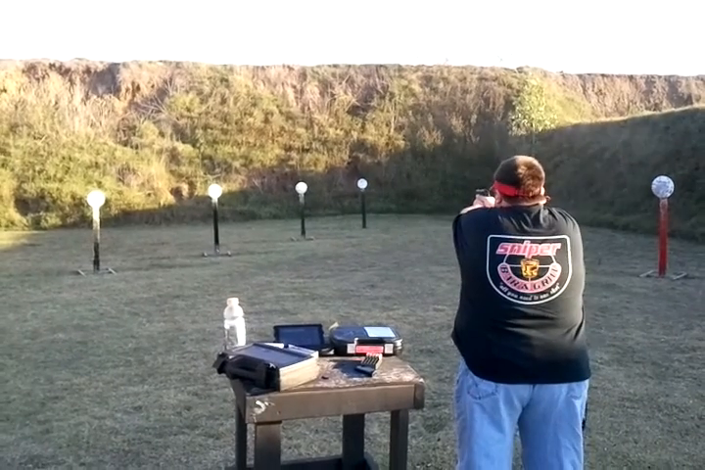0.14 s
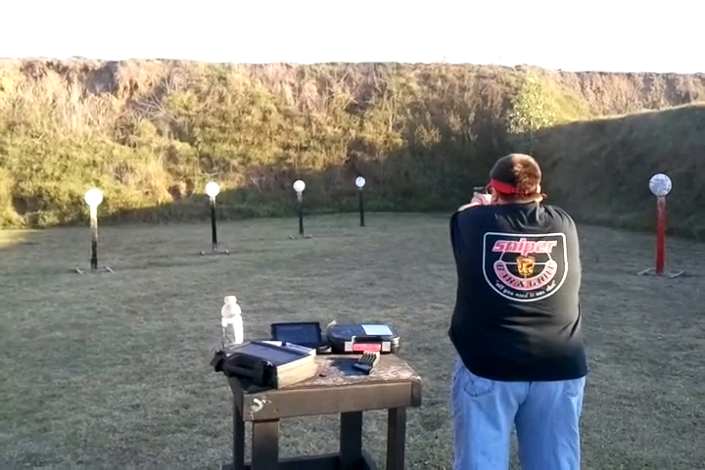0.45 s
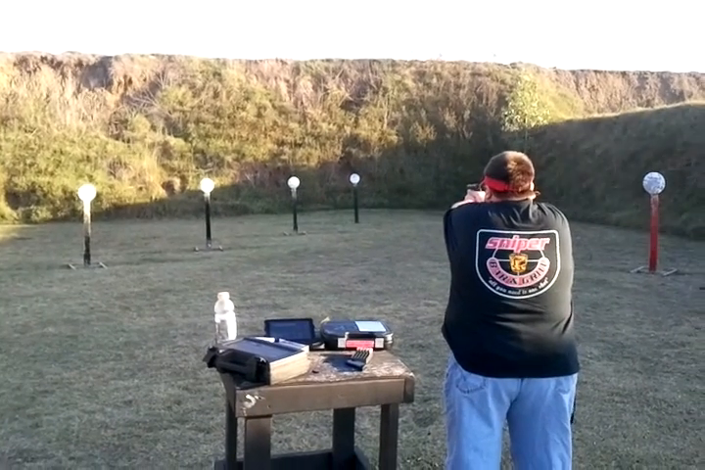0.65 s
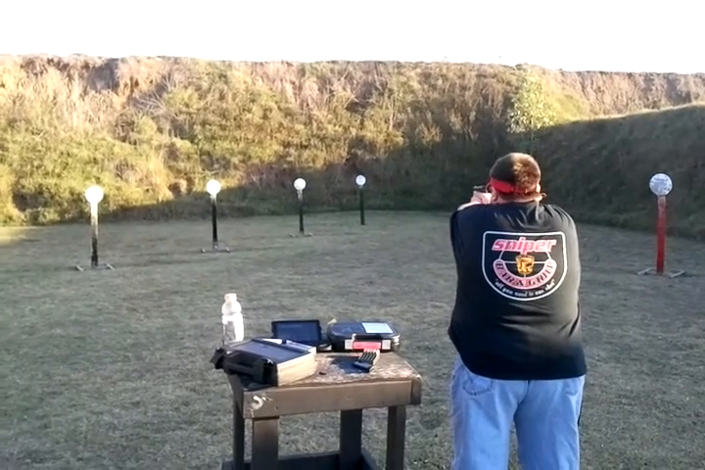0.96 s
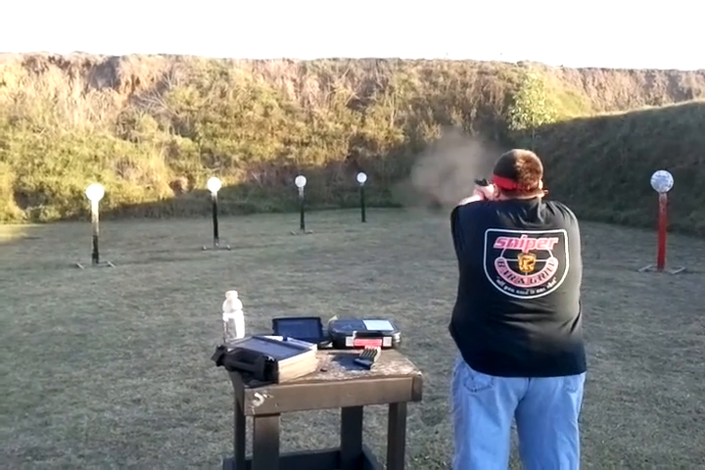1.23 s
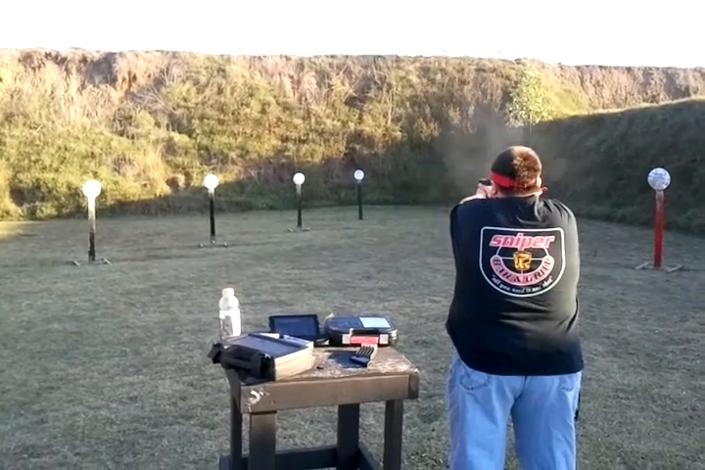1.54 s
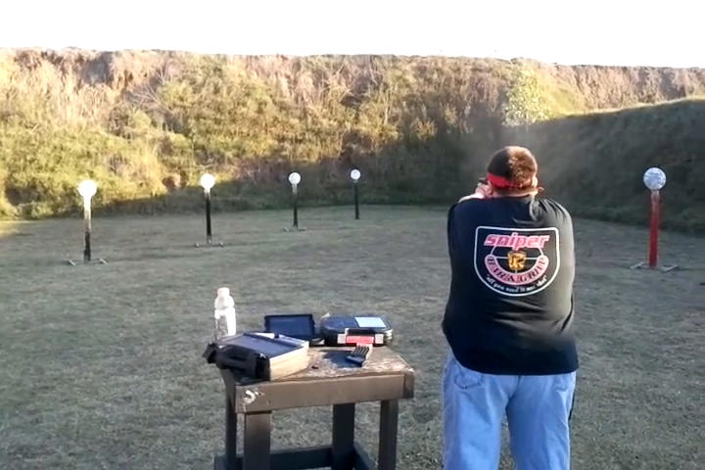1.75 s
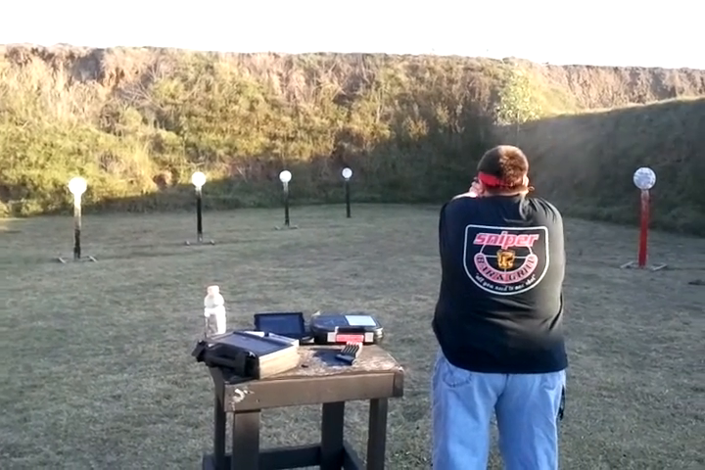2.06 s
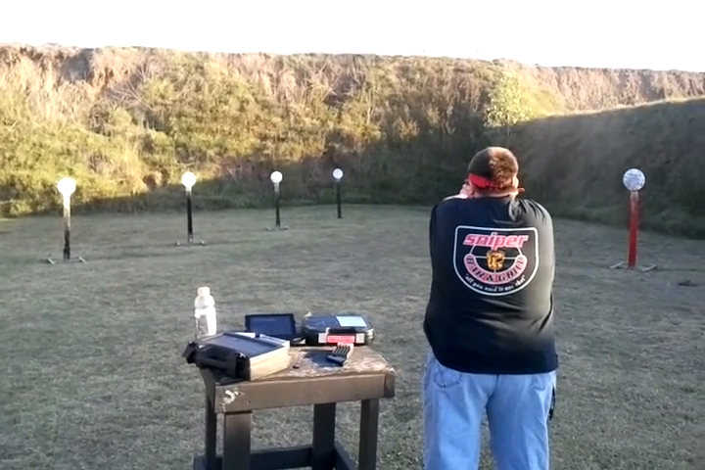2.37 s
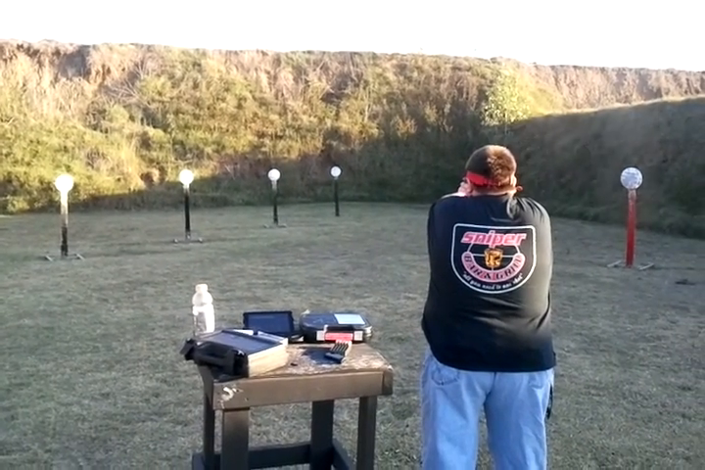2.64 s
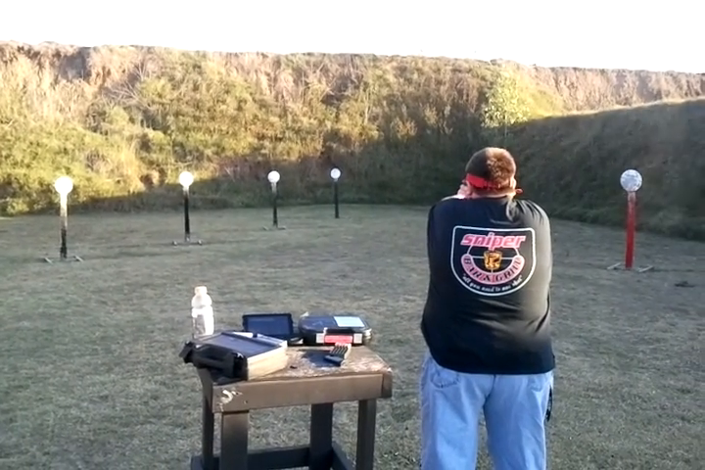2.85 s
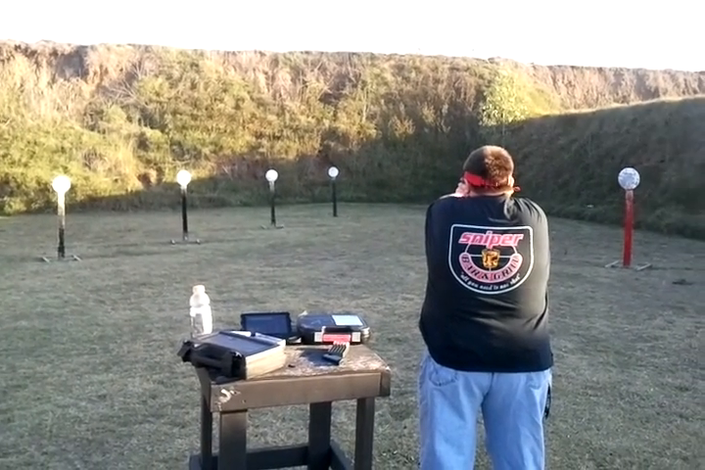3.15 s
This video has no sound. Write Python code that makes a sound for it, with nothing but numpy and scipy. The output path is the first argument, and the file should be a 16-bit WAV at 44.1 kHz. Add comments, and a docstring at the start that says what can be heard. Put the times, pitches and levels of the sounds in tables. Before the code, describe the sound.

A single close revolver shot cracks and echoes as the bullet rings a steel plate.

```python
"""Revolver shot on a steel plate

One shot on an outdoor range, close enough to overload and briefly choke a small microphone.
The bullet rings a steel plate; earth banks and far trees throw the blast back, as they still do
for an earlier shot. The gun's action clicks before and after, over a low rumble of wind."""
import sys
import numpy as np
from scipy import signal
from scipy.fft import rfft, irfft
from scipy.io import wavfile

SR = 44100
rng = np.random.default_rng(int(sys.argv[2]) if len(sys.argv) > 2 else 0)


def dump_mix(stems):
    """Bounce the given channels to the path in sys.argv[1] as a 16-bit WAV at rate SR."""
    frames = np.atleast_2d(stems).T  # one column per channel
    limited = np.clip(frames, -1, 1)  # hard clip at full scale
    pcm = np.round(limited * 32767).astype(np.int16)
    wavfile.write(sys.argv[1], SR, pcm)


N = 145530
T = np.arange(N) / SR
SHOT_S, EARLIER_SHOT_S, HIT_S = 1.260, -.541, 1.339
TRAVEL = .51  # the diaphragm's full swing

# Spectrum of the muzzle blast: f/Hz, relative level/dB
BLAST_SPECTRUM = [(40, 5.5), (300, 6.5), (900, 5), (2000, -2.5), (3300, 1), (4600, 6), (7000, -1.5),
                  (10000, -35)]
# Bright sizzle of the echoes and the bullet's splash: f/Hz, relative level/dB
SIZZLE_SPECTRUM = [(500, -40), (1800, -11), (2600, -3.5), (3300, -8), (4400, -0.5), (5300, -1.5),
                   (6800, -9), (10000, -27.5)]


def amp(db):
    """Decibels to gain."""
    return 10 ** (np.asarray(db) / 20)


def unit(x):
    """Scales to rms 1."""
    return x / np.sqrt(np.mean(x ** 2) + 1e-20)


def eq_gain(spectrum, hz):
    """Gain of a dB curve, read on a log-frequency axis."""
    f, db = np.transpose(spectrum)
    return amp(np.interp(np.log(hz + 1), np.log(f + 1), db))


def noise(spectrum):
    """Noise of a given colour, at rms 1."""
    gain = eq_gain(spectrum, np.fft.rfftfreq(N, 1 / SR))
    return unit(irfft(rfft(rng.standard_normal(N)) * gain, N))


def wander(seconds):
    """Smooth random drift on the given time scale, at rms 1."""
    smoothing = np.exp(-(np.fft.rfftfreq(N, 1 / SR) * 2 * seconds) ** 2)
    return unit(irfft(rfft(rng.standard_normal(N)) * smoothing, N))


def fade(t, t60):
    """Exponential decay from t = 0."""
    return np.exp(-np.log(1000) * np.maximum(t, 0) / t60)


def burst(peak_s, rise, hold, t60):
    """Envelope that is fully up at peak_s, holds and dies away; times in seconds."""
    return np.clip((T - peak_s) / rise + 1, 0, 1) ** 2 * fade(T - peak_s - hold, t60)


def add(mix, start_s, sound):
    """Mixes a sound in at a time."""
    part = mix[max(round(start_s * SR), 0):][:len(sound)]
    part += sound[:len(part)]


def blast():
    """The muzzle crack and the slow pressure swing behind it."""
    # Suction, then rebound on the diaphragm: t after the shot/s, pressure/full travel
    surge = [(0, 0), (.007, -.25), (.012, -2), (.016, -4.5), (.027, -3.5), (.035, -1.1), (.046, -.2),
             (.061, .2), (.065, 1.5), (.078, .9), (.1, .45), (.15, .22), (.26, 0)]
    crack = amp(12.5) * noise(BLAST_SPECTRUM) * burst(SHOT_S + .001, rise=.002, hold=.0072, t60=.012)
    return crack + TRAVEL * np.interp(T - SHOT_S, *np.transpose(surge))


def echoes(shot_s):
    """Banks and trees throw back grainy copies of the blast, thinner from farther away."""
    # Reflections: delay/s, rise/s, hold/s, t60/s, body gain/dB, sizzle gain/dB
    reflections = [(0.038, 0.023, 0.033, .1, -19.5, -17.5), (0.044, 0.0016, 0.0011, .01, -9, -16),
                   (0.056, .001, .003, 0.036, -14, -12.5), (.08, 0.0048, 0.0201, .1, -24.5, -19.5),
                   (.116, 0.0079, .038, 0.063, -23, -17), (0.18, .02, 0.029, 0.68, -42, -31),
                   (0.283, 0.059, .055, 0.11, -37.5, -37.5), (0.427, 0.0086, .022, .07, -48.5, -37),
                   (0.49, 0.039, 0.02, 0.29, -40, -63.5), (0.624, 0.09, 0.013, 1, -49, -55.5),
                   (0.921, 0.071, 0.041, 0.36, -46.5, -58.5), (1.028, 0.048, 0.013, 0.24, -57.5, -65),
                   (1.3, 0.21, .14, .9, -56, -84.5)]
    # Body of each reflection: f/Hz, relative level/dB
    body_spectrum = [(40, -11), (150, -6), (300, -8.5), (420, -9.5), (620, -3), (1100, -0.5), (1800, -10.5),
                     (2700, -9.5), (4000, -25.5), (8000, -38.5)]
    grass_hz, grass_db_per_s = 580, 33.5  # grass soaks up the low end along the way
    body, sizzle, out = noise(body_spectrum), noise(SIZZLE_SPECTRUM), np.zeros(N)
    lows = signal.sosfiltfilt(signal.butter(2, grass_hz, fs=SR, output="sos"), body)
    for delay, rise, hold, t60, body_db, sizzle_db in reflections:
        thinned = body - lows * (1 - amp(-grass_db_per_s * delay))
        echo = crossing_paths(amp(body_db) * thinned + amp(sizzle_db) * sizzle)
        out += burst(shot_s + delay, rise, hold, t60) * echo
    grain = amp(2 * wander(seconds=.0025))
    # One far reflection comes back as a short tone.
    tone = burst(shot_s + .891, rise=.0017, hold=.0095, t60=.038) * np.sin(2 * np.pi * 1130 * T)
    return out * grain + amp(-38.5) * tone


def crossing_paths(echo, depth_db=3.5, spacing_hz=129):
    """Many crossing paths give a reflection its own random peaks and dips."""
    hz = np.fft.rfftfreq(N, 1 / SR)
    ripple = np.interp(hz / spacing_hz, np.arange(400), rng.standard_normal(400))
    return irfft(rfft(echo) * amp(depth_db * ripple), N)


def plate():
    """Lead shatters on the steel; its ring fades in, pulses as it dies away, and echoes off the bank."""
    # Ringing tones: f/Hz, relative level/dB, t60/s, pulse rate/Hz, pulse depth, first pulse/s, rise/s
    tones = [(2876, -21, .8, 7.2, .35, .06, .07), (4388, -14, .82, 7.4, .58, .086, .075),
             (6160, -19, .85, 8.2, .55, .052, .055)]
    # The ring coming back off the bank: delay/s, gain/dB
    bank_echoes = [(0.749, -34), (.89, -29)]
    t, ring = np.maximum(T - HIT_S, 0), np.zeros(N)
    damping = np.exp(-(t / .38) ** 4)  # cuts the late ring shorter than its t60
    for hz, db, t60, pulse_hz, depth, pulse_s, rise_s in tones:
        phase = 2 * np.pi * (hz * t + rng.random())
        pulsing = np.sin(phase) + depth * np.sin(phase - 2 * np.pi * pulse_hz * (t - pulse_s))
        envelope = np.minimum(t / rise_s, 1) ** 2 * fade(t, t60) * damping
        ring += amp(db + 5) * envelope * pulsing
    dull_ring = signal.sosfilt(signal.butter(4, 2700, fs=SR, output="sos"), ring)
    splash = amp(-10) * noise(SIZZLE_SPECTRUM) * burst(HIT_S, rise=.001, hold=.013, t60=.07)
    out = ring + splash
    for delay, db in bank_echoes:
        add(out, delay, amp(db) * dull_ring)
    return out


def action():
    """Hammer and cylinder snap and rattle into the gun's short modes."""
    # Clicks: t/s, gain/dB, low-mode trim/dB, mid-mode trim/dB, high-mode trim/dB, rattle/s
    clicks = [(0.0208, -25, -33, -19, -25, 0.0071), (0.165, -40.5, -35, -8.5, -14, 0.0083),
              (0.3317, -33.5, -41, -35, -7, 0.0044), (0.3839, -32.5, -22, -16, -11, 0.0052),
              (0.415, -39.5, -20, -19, -8.5, 0.006), (0.4488, -35, -28, -32, -10.5, 0.006),
              (0.4884, -41, -11.5, -16, -17.5, 0.006), (0.5412, -44.5, -13, -16, -26, 0.0044),
              (0.7583, -43, -18, -24, -17, 0.0052), (0.9562, -43, -35, -30, -9.5, 0.0041),
              (1.8648, -35, -5.5, 5, -15, 0.014), (1.9844, -24.5, -20.5, -12, -14, 0.0077),
              (2.0862, -38, -12.5, -7, -18, 0.013), (2.1119, -35.5, -30, -6, -17, 0.0052),
              (2.1855, -42.5, -19, -6, -25, 0.0034), (2.2194, -39, -14.5, -11, -32, 0.008),
              (2.2864, -37.5, -13.5, -13, -37, 0.0069), (2.3411, -42.5, -11, -13, -32, 0.0024),
              (2.4032, -45.5, -29, -12.5, -16, 0.0041), (2.837, -33, -16, -4.5, -4.5, 0.0076),
              (2.9161, -40.5, -20.5, -4.5, -7.5, 0.0054), (2.9637, -46, -17, -11, -15, 0.0052)]
    # The gun's modes in low, mid and high groups: f/Hz, relative level/dB, t60/s
    mode_groups = [
        [(1650, -12, .015), (2455, 0, .03), (2740, -3, .035)],
        [(4080, -3, .015), (4370, 0, .025), (4740, -5, .025)],
        [(5280, -1, .028), (5680, 0, .024), (6740, -8, .015)],
    ]
    # Balance of the three groups: gain/dB
    balance = [1.5, -6, -0.5]
    t, out = np.arange(SR // 4) / SR, np.zeros(N)
    rings = [sum(amp(db) * fade(t, t60) * np.sin(2 * np.pi * hz * t) for hz, db, t60 in group)
             for group in mode_groups]
    attack = t < .02
    for start_s, db, *trims_db, rattle_s in clicks:
        rattle = amp(-22.5) * np.exp(-(t / rattle_s) ** 2) + amp(-47) * fade(t, t60=.25)
        strike = (t == 0) + rattle * rng.standard_normal(len(t))
        click = amp(-23) * strike / strike[attack].std()  # the bare snap
        for ring, group_db, trim_db in zip(rings, balance, trims_db):
            ringing = signal.fftconvolve(strike, ring)[:len(t)]
            click += amp(group_db + trim_db) * ringing / ringing[attack].std()
        add(out, start_s, amp(db) * click)
        add(out, start_s + .0096, amp(db - 10) * click)  # bounce off the ground
    return out


def knocks():
    """Soft, dull bumps of handling."""
    # Bumps: t/s, level/dB
    bumps = [(0.261, -44), (0.417, -54), (0.76, -52), (2.218, -40)]
    # Their dull colour: f/Hz, relative level/dB
    bump_spectrum = [(60, 1.5), (500, 14), (1400, 0), (3000, -21), (8000, -49)]
    envelope = sum(amp(db) * burst(s, rise=.002, hold=.0035, t60=.034) for s, db in bumps)
    return noise(bump_spectrum) * envelope


def wind():
    """Wind rumbles and flutters at the microphone over a faint hiss."""
    # Steady rumble and distant hiss: f/Hz, relative level/dB
    air_spectrum = [(1, 12.5), (6, -11.5), (14, -10), (28, -4.5), (70, -6.5), (110, -19.5), (200, -28),
                    (400, -38), (1000, -39), (2000, -46.5), (3500, -48), (4500, -49.5), (6500, -45.5),
                    (7600, -66), (9000, -87.5)]
    # Flutter at the microphone: f/Hz, relative level/dB
    flutter_spectrum = [(30, -25), (130, -3), (300, -9.5), (700, -18.5), (2000, -32.5)]
    # Rise and fall of the flutter: t/s, relative level/dB
    gusts = [(0, 1), (.5, -5.5), (1.1, -7.5), (1.7, -0.5), (2.6, -1), (3.0, -3), (3.3, -4)]
    flutter_db = -51.5 + np.interp(T, *np.transpose(gusts)) + .5 * wander(seconds=.055)
    return amp(-34) * noise(air_spectrum) + amp(flutter_db) * noise(flutter_spectrum)


def scene():
    """Everything that reaches the microphone, in mono."""
    gunfire = blast() + echoes(SHOT_S) + echoes(EARLIER_SHOT_S)
    return (gunfire + plate() + action() + knocks() + wind())[None]


def record(dry):
    """The off-centre diaphragm saturates, the port colours the sound and the converter clips."""
    # Colour of the microphone's port: f/Hz, gain/dB
    port_eq = [(20, 1), (1000, -1), (3300, -1), (4000, 2), (4500, 6), (5400, 1), (6400, -1), (7100, -5),
               (7700, -21), (8600, -29), (9600, -50.5)]
    off_centre, ceiling, band_limit_hz = -.164, .79, 15900
    # A little of the blast gets past the pinned diaphragm, through the case.
    leak = amp(-34.5) * noise(BLAST_SPECTRUM) * burst(SHOT_S, rise=.011, hold=0, t60=.15)
    choked = TRAVEL * np.tanh((dry + off_centre) / TRAVEL) + leak
    log_gain = np.log(eq_gain(port_eq, abs(np.fft.fftfreq(2048, 1 / SR))))
    port = np.fft.ifft(np.exp(np.conj(signal.hilbert(log_gain)))).real  # minimum-phase response
    clipped = np.clip(signal.oaconvolve(choked, port[None])[:, :N], -ceiling, ceiling)
    lowpass = signal.firwin(511, band_limit_hz, window=("kaiser", 9), fs=SR)
    return signal.oaconvolve(clipped, lowpass[None], "same")


dry = scene()
out = record(dry)
dump_mix(out)
```